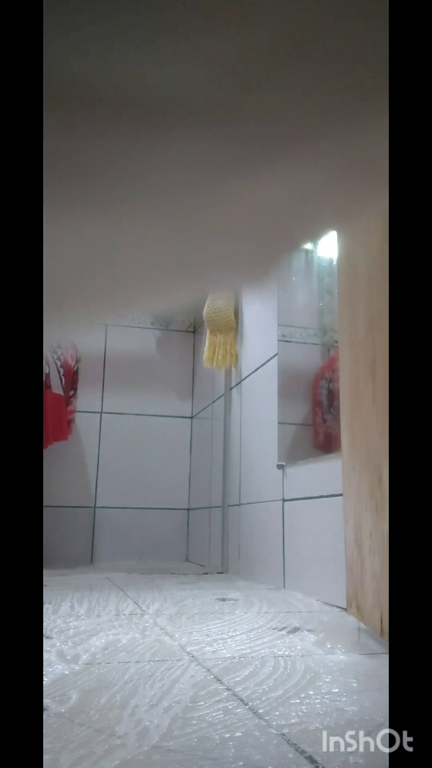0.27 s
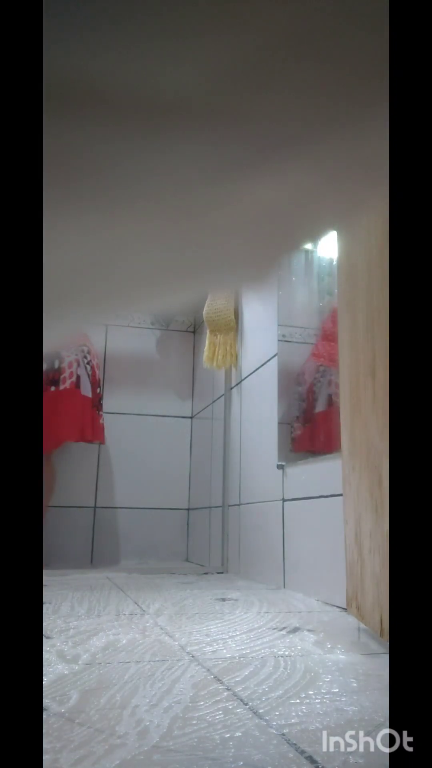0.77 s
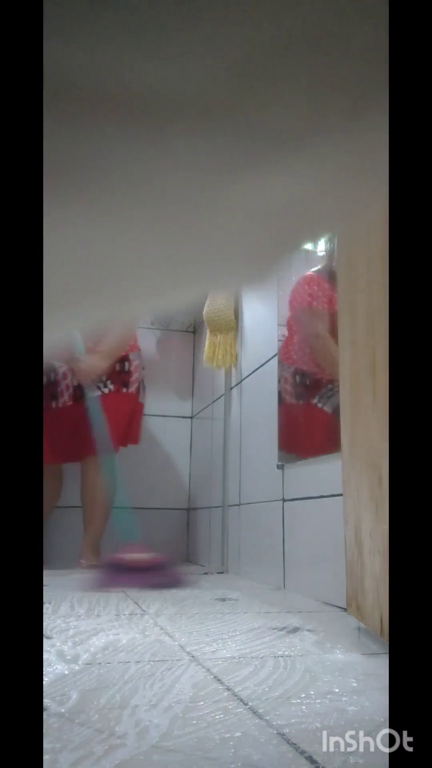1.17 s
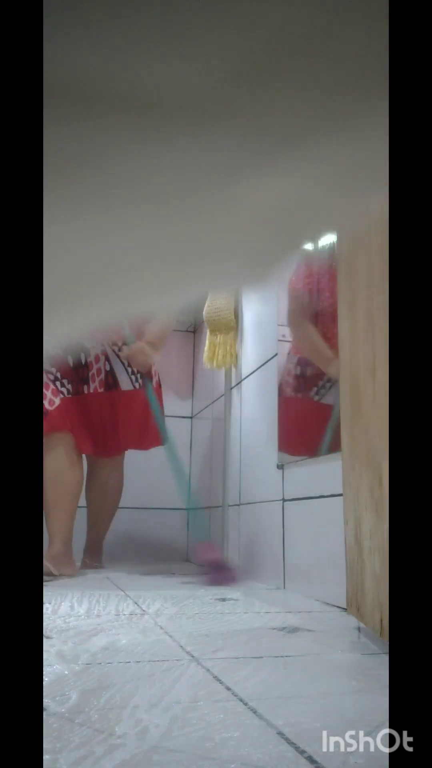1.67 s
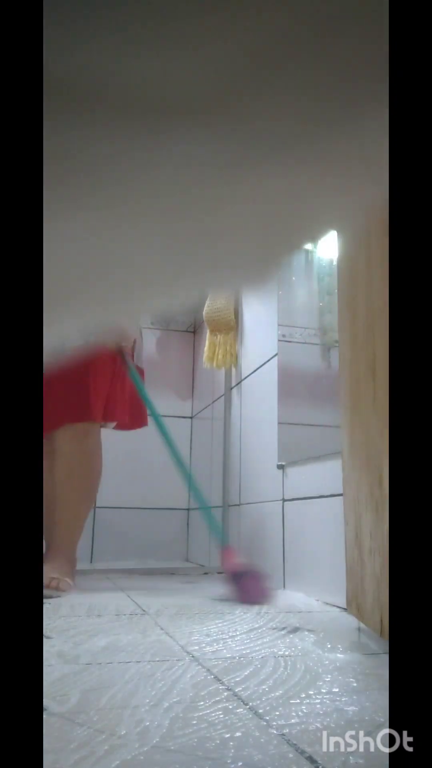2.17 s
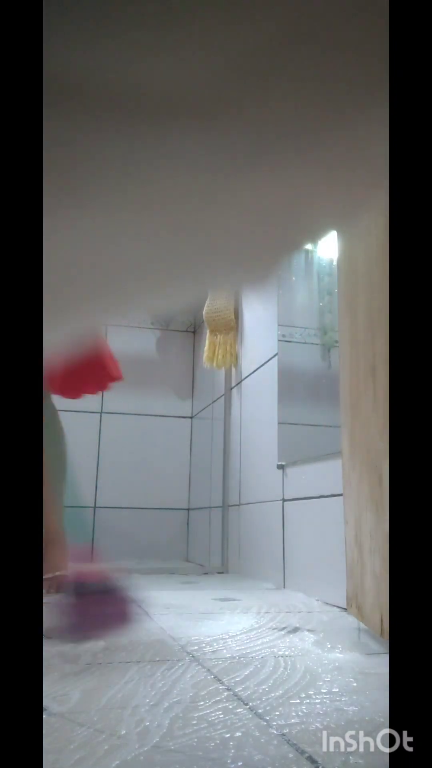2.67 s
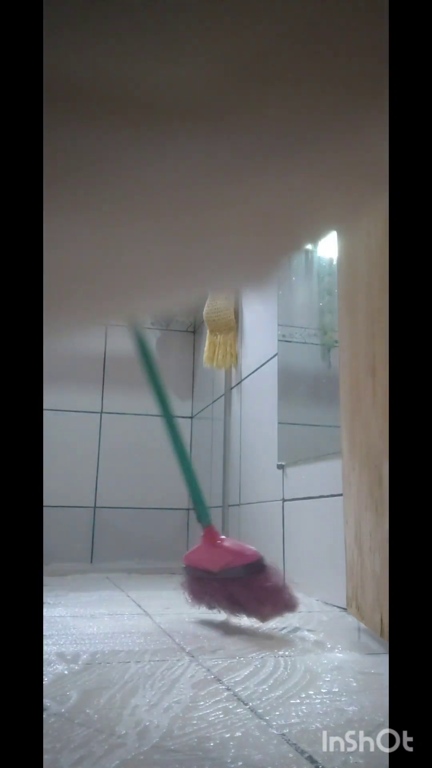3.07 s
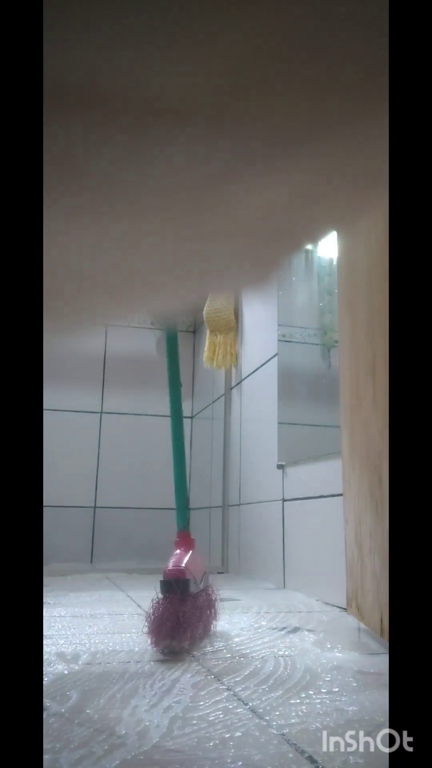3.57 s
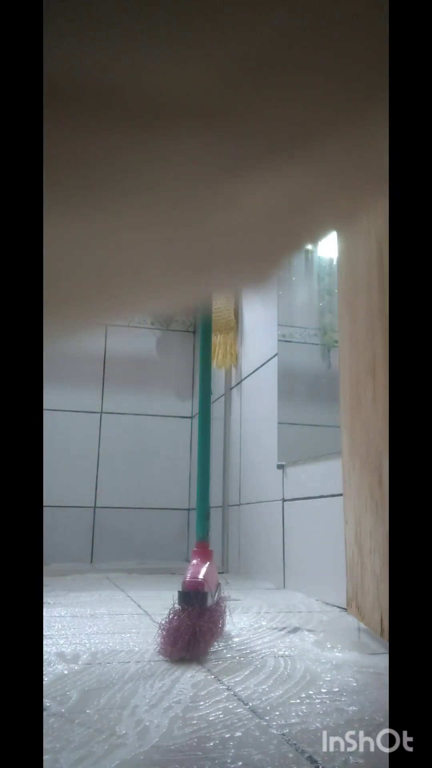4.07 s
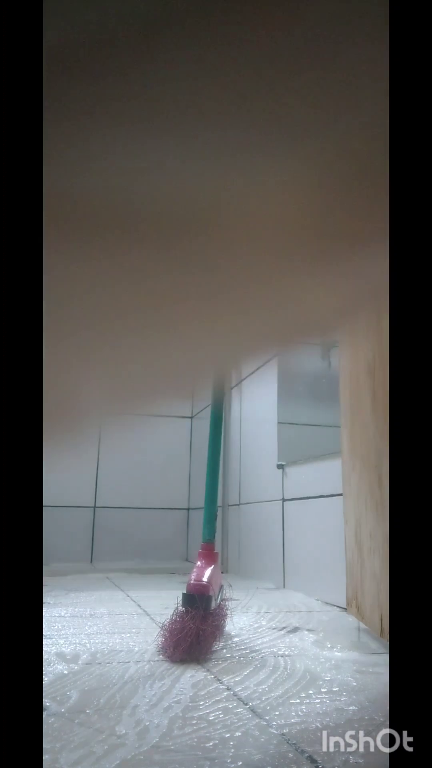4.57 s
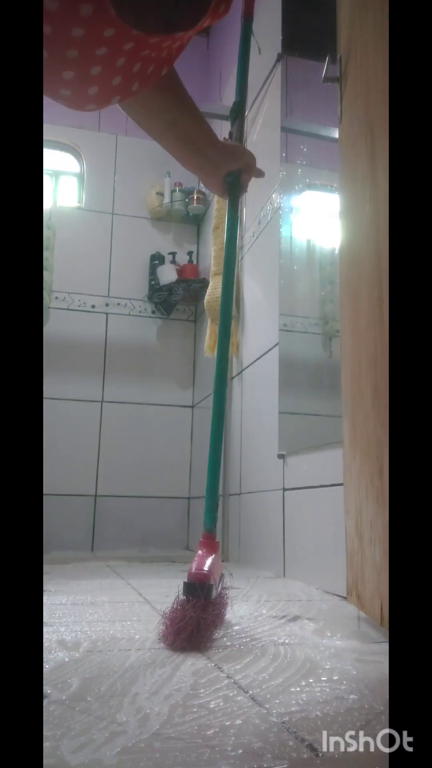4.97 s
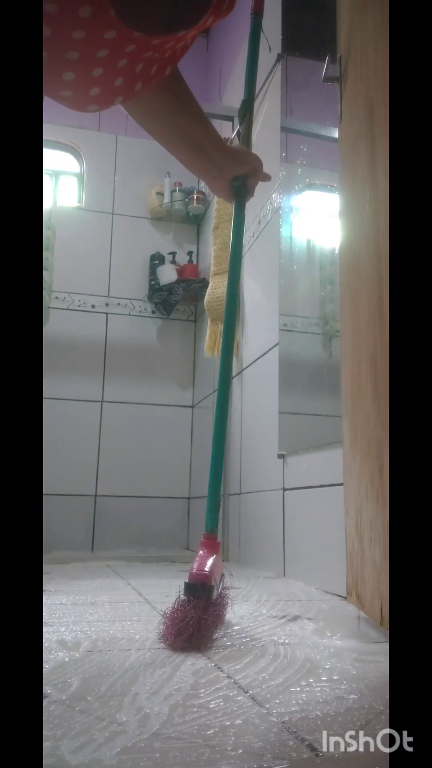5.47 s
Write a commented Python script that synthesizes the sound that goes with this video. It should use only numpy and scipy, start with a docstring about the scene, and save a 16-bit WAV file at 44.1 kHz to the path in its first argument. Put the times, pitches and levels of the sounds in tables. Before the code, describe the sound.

Muffled bristle scrubbing on soapy tile, faint ticks as the broom is set down, then cloth dragged roughly off the microphone with thumps and pops.

```python
"""A low house rumble, microphone hiss and hum last throughout, swelling and wavering.
First a stiff broom scrubs wet tiles in a small bathroom, heard by a phone under a cloth: noisy bristle
clicks ring at a moving pitch. Fainter scuffs follow, with ticks and squeaks as the broom is set down.
Then the cloth is pulled off: coloured clicks and noise make its rubs and pushes, puffs and rings
make its snaps and bumps, and trapped air pops at the left microphone."""
import sys
import numpy as np
from scipy import signal
from scipy.fft import rfft, irfft, next_fast_len
from scipy.io import wavfile
from scipy.ndimage import uniform_filter1d

SR = 44100
rng = np.random.default_rng(int(sys.argv[2]) if len(sys.argv) > 2 else 0)


def to_wav(sig):
    """Store sig (one row per channel, or 1-D mono) as 16-bit WAV at the path in sys.argv[1].

    Samples outside -1..1 are clipped; the rate is SR.
    """
    pcm = np.clip(np.atleast_2d(sig), -1, 1) * 32767
    pcm = np.round(pcm).astype(np.int16)
    wavfile.write(sys.argv[1], SR, pcm.T)  # frames by channels


N = 252693
SIZE = next_fast_len(N + 4096)  # padded length for the frequency filters
HZ = np.fft.rfftfreq(SIZE, 1 / SR)
STEP = 32  # samples between the points of a swell

# House floor noise, colour: pitch_hz, level_db (relative)
FLOOR_COLOUR = [(13, -60), (22, -17.5), (70, -6), (135, -3.5), (183, -13.5), (216, -9.5), (248, -5.5),
                (317, -11.5), (480, -9.5), (582, -17), (632, -10.5), (766, -21), (981, -21), (1440, -29.5),
                (15800, -47.5)]
FLOOR_DB = -63.5
# Likeness of the floor noise at both microphones: pitch_hz, likeness (-1 to 1)
FLOOR_LIKENESS = [(60, 0.99), (150, 0.96), (380, 1), (950, -0.12), (2380, -0.021), (5980, 0.22),
                  (15000, -0.61)]
# Side of the floor noise: pitch_hz, left_minus_right_db
FLOOR_SIDE = [(60, 0.5), (150, -1), (380, 3.5), (950, 6.5), (2380, -1), (5980, 0), (15000, 2)]
# Wavering hum: time_s, level_db (before the waver)
HUM_LEVEL = [(0, -64), (.47, -72), (.8, -69), (.89, -82), (1.96, -70), (4.25, -74), (5.5, -70), (5.73, -74)]
HUM_HZ = 217
# Low drone swells: top_s, rise_s, hold_s, fall_s, level_db (before the waver)
DRONE_SWELLS = [(1.43, 0.036, 0.14, 0.17, -60.5), (1.7, .08, 0.044, .12, -64.5), (1.94, .09, .02, .06, -55)]
DRONE_HZ = 80.7

# Broom strokes and last faint scuffs: top_s, rise_s, hold_s, fall_s, head_db, head_pitch_hz,
# rasp_over_head_db, fizz_over_head_db, rumble_over_head_db (levels before the room)
BROOM_STROKES = [(.07, 0.098, 0.043, 0.071, -37, 1130, -8, -23.5, -13.5),
                 (.232, 0.047, .005, 0.046, -43, 1140, -8, -21.5, -8.5),
                 (0.399, .1, 0.023, 0.11, -41, 1070, -6, -16.5, -12.5),
                 (.604, 0.078, 0.028, 0.047, -51, 1290, -6.5, -11, -12),
                 (.738, 0.04, 0.0043, 0.041, -46.5, 1180, -5.5, -13, -11),
                 (0.825, 0.15, 0.0076, 0.12, -54, 1230, -3.5, -11, -8),
                 (1.182, 0.074, .055, 0.069, -52, 1150, -4, -12.5, -11),
                 (1.415, 0.16, 0.0076, 0.098, -55.5, 1010, -5.5, -13.5, -16.5),
                 (1.689, 0.064, .03, .05, -59, 920, -2, -8.5, -9),
                 (1.748, 0.021, 0.028, 0.037, -49.5, 870, -6, -18.5, -12.5),
                 (1.904, .08, 0.035, 0.041, -47.5, 1180, -6, -18, -11),
                 (2.119, .1, 0.061, 0.036, -47, 1070, -6.5, -18.5, -12),
                 (2.328, 0.099, 0.066, .04, -47.5, 1070, -6, -20.5, -13.5),
                 (2.498, 0.095, 0.12, 0.032, -51.5, 1000, -4.5, -15.5, -11),
                 (2.705, 0.033, 0.012, 0.073, -62, 920, -1, -10, -12),
                 (2.762, 0.1, 0.0049, 0.059, -59, 970, -6, -14, -12),
                 (2.99, 0.26, 0.042, 0.054, -59, 940, -4, -11.5, -13),
                 (3.135, .02, 0.018, 0.11, -74, 1240, 3.5, -10, -6),
                 (3.263, 0.014, .005, 0.13, -64, 770, -7, -11.5, 2),
                 (3.486, 0.059, .005, .07, -70.5, 776, -3, -17, -1),
                 (3.548, 0.0082, 0.0091, 0.11, -65.5, 910, -5, -10, -6),
                 (3.628, .04, .005, 0.043, -66, 870, -14, -23, -9),
                 (3.718, 0.018, .005, 0.11, -72, 746, -9, -31, 6),
                 (3.815, 0.016, 0.0088, 0.25, -72.5, 780, -3.5, -15, -1),
                 (3.98, 0.11, .015, .03, -72, 845, -24, -12, -3),
                 (4.172, .01, 0.056, 0.057, -73, 840, -14, -18, 4)]
# Bristle colour through the cloth: pitch_hz, level_db (relative)
BRISTLE_COLOUR = [(32, -37), (55, 1), (163, -2), (274, 1.5), (449, -7), (556, -5.5), (625, -7.5),
                  (870, -5.5), (1810, -6.5), (2040, -2), (3340, -10.5), (4040, -12.5), (5890, -23.5),
                  (15500, -37.5)]
STROKE_DROP_DB, STROKE_ROUND = -15.5, 1.007  # level one rise or fall time away; 1 = pointed, 2 = rounded
# Share of that drop which each layer follows
HEAD_SWELL, RASP_SWELL, FIZZ_SWELL, RUMBLE_SWELL = 0.99, 0.9, 0.72, 0.75
# Change in dB per second of hold: the broom bears down, the suds thin out
HEAD_CLIMB_DB, RASP_CLIMB_DB, FIZZ_CLIMB_DB = 35, 24, -26
HEAD_SAG = 0.97  # pitch at the end of a stroke, as a share of that at its top
# Dull knocks of the broom head: time_s (starts 4 ms earlier), level_db, pitch_hz
HEAD_KNOCKS = [(0.036, -47.5, 275), (0.064, -43, 283), (0.23, -52, 229), (0.399, -48, 253),
               (0.737, -45, 274), (0.771, -52.5, 250), (0.837, -55, 288), (1.4, -62, 236),
               (1.759, -66, 227)]
# Bristle and handle ticks: start_s, level_db (before the room), pitch_hz, scuff_over_tick_db (before gain)
BROOM_TICKS = [(0.091, -30.5, 1990, -6), (1.084, -54, 940, -9.5), (1.852, -51, 992, -7),
               (2.995, -54.5, 940, -4), (3.134, -65, 2530, 8), (3.263, -60.5, 1000, -2),
               (3.547, -56, 1520, -0.5), (3.617, -53, 950, -10), (3.712, -71, 1370, -15),
               (3.809, -59.5, 1040, -7), (4.172, -65.5, 1100, -3), (5.382, -69.5, 1100, -1),
               (5.587, -66, 930, -13)]
# Squeaks of sliding wet bristles: top_s, rise_s, hold_s, fall_s, level_db (before the room), pitch_hz, width_hz
BRISTLE_SQUEAKS = [(3.133, 0.014, 0.027, .04, -65, 1800, 298), (3.132, .015, 0.036, .04, -72, 2570, 110),
                   (3.222, .015, .02, .02, -71.5, 1200, 120), (3.288, .03, 0.045, .04, -80.5, 2525, 110),
                   (3.48, .03, .01, .03, -76, 2980, 200), (3.81, .005, .015, 0.018, -78, 2620, 150)]
# Resonances of the air under the cloth: pitch_hz, width_hz, level_db
HOLLOW_RINGS = [(896, 23, -0.5), (1150, 77, -11), (2304, 270, 0), (2563, 190, -0.5), (3470, 460, -19),
                (3940, 670, -4.5), (5100, 260, -3)]
# Likeness of the broom at both microphones: pitch_hz, likeness (-1 to 1)
BROOM_LIKENESS = [(60, 1), (300, 0.91), (700, 1), (1500, 0.35), (4000, 0.18), (9000, .2)]
# Side of the broom: pitch_hz, left_minus_right_db
BROOM_SIDE = [(60, 0), (130, 0), (290, -0.5), (640, 9), (1410, 1.5), (3100, -4.5), (6820, -9), (15000, -12)]
# Delay as the broom moves: time_s, left_late_ms
BROOM_DELAY = [(0, 0.42), (1, 0.3), (1.15, 0.27), (2.4, 0.2), (2.6, 0.17), (5.73, 0.12)]

# Three pulls of the cloth: time_s, rub_db, hiss_over_rub_db, push_db (before side and catches)
CLOTH_PULLS = [
    [(4.24, -102, -2, -73), (4.252, -90, 11, -76), (4.274, -72.5, -7.5, -65), (4.354, -44, -9.5, -47.5),
     (4.41, -45, -9, -47), (4.426, -39.5, -18.5, -48), (4.43, -42.5, -6, -44), (4.458, -40, -16, -42),
     (4.478, -55.5, -10, -49.5), (4.496, -55, -12, -61.5), (4.556, -55, -7.5, -59), (4.572, -85, -3, -81),
     (4.585, -59, 1, -55)],
    [(4.586, -64, -24, -52), (4.598, -39, -8, -39.5), (4.642, -35, -5, -30.5), (4.65, -43, -0.5, -40),
     (4.662, -28.5, -7.5, -35), (4.686, -36.5, -3.5, -34.5), (4.774, -42, -12.5, -43.5),
     (4.816, -40, -15.5, -45), (4.854, -33, -6, -36), (4.87, -41.5, -1.5, -39.5), (4.88, -37.5, -5, -42),
     (4.914, -37.5, -6.5, -38.5), (4.93, -38, -5, -31)],
    [(4.931, -44, -2, -32), (4.937, -39, -5.5, -33.5), (4.959, -40, -14.5, -30.5),
     (4.993, -39.5, -15.5, -33.5), (4.999, -48, -10, -32.5), (5.011, -43, -17, -33.5),
     (5.033, -48, -12, -42), (5.053, -42, -19, -39), (5.073, -53.5, -7, -48.5), (5.093, -49, -9.5, -45),
     (5.191, -56.5, -8, -57.5), (5.215, -54.5, -8.5, -54.5), (5.255, -69.5, -4.5, -67),
     (5.46, -84.5, 0.5, -73)],
]
# Rub colour: pitch_hz, level_db (relative)
RUB_COLOUR = [(590, -7.5), (1000, -1), (1690, -3.5), (1980, -6), (2610, -3), (3290, -7.5), (4160, -29),
              (6000, -36.5), (7800, -42), (13200, -120)]
# Fibre hiss colour at the right: pitch_hz, level_db (relative)
RIGHT_HISS_COLOUR = [(2060, -35.5), (3500, -6), (4180, -6.5), (5940, -11.5), (7140, -10.5), (10200, -21.5),
                     (14200, -16.5), (15100, -21.5), (15800, -21.5)]
# Fibre hiss colour at the left, which stays half covered: pitch_hz, level_db (relative)
LEFT_HISS_COLOUR = [(2500, -20.5), (4000, 2.5), (5500, -4), (7200, -6.5), (8800, -15.5), (15000, -20)]
# Push colour: pitch_hz, level_db (relative)
PUSH_COLOUR = [(32, -34), (55, -4.5), (177, -2), (367, -3.5), (523, -5.5), (947, -1.5), (1050, 4.5),
               (1250, -4), (1900, -15.5), (2470, -36), (4180, -120)]
# Pocket between cloth and case changes size: time_s, pitch_hz
POCKET_PITCH = [(4.24, 2170), (4.58, 2170), (4.62, 1950), (4.9, 2100), (4.94, 1740), (5.0, 1760),
                (5.1, 2080), (5.46, 2100)]
# The hand moves from side to side: time_s, left_minus_right_db
PUSH_SIDE = [(4.24, 2), (4.4, -9), (4.5, 2), (4.66, -10.5), (4.88, -7.5), (4.94, 0), (5.03, 5),
             (5.08, -1.5), (5.15, 3), (5.46, 7)]
RUB_PAN_DB, DRAG_DB = 1.5, -8  # left minus right of the rub; drag on the case over the push
# The case is hauled along once: top_s, rise_s, hold_s, fall_s, level_db (before side)
CASE_HAUL = [(4.945, 0.014, 0.052, 0.026, -35.5)]
HAUL_RUB_DB = -10  # the haul rubs the fibres too
HISS_PAN_DB, HISS_PAN_PER_DB, HISS_FROM_DB = -12, -0.34, -60  # louder hiss leans further right
CRACKLE_DB, CRACKLES_PER_S = -14.5, 150  # small random snaps, over the hiss
# Fibres snap at a microphone: start_s, level_db (before side)
FIBRE_SNAPS = [(4.2677, -58), (4.3226, -44), (4.6014, -29.5), (4.6169, -24), (4.6608, -34), (4.6946, -27.5),
               (4.7184, -41), (4.755, -34), (4.8454, -33), (4.9234, -46), (5.049, -50), (5.0833, -58),
               (5.1023, -46), (5.1104, -49), (5.2234, -60)]
SNAP_T60 = .005  # seconds to fade by 60 dB
SNAP_PAN_DB, SNAP_PAN_PER_DB, SNAP_FROM_DB = -16.5, 0.15, -45  # snaps lean right, louder ones slightly less
# The hand bumps the phone: start_s, level_db (before side), pitch_hz, left_minus_right_db,
# crunch_over_bump_db (before gain)
PHONE_BUMPS = [(4.627, -42.5, 334, -11.5, -15), (4.637, -22.5, 150, -9.5, 4.5),
               (4.641, -24.5, 340, 17, -1.5), (4.846, -25.5, 573, -11, -1.5), (4.854, -23, 290, -23, 1),
               (4.935, -23.5, 342, 1, -22), (4.956, -19, 359, 3.5, -20), (4.966, -26, 355, -3, -19),
               (5.011, -30.5, 473, 1, -13), (5.047, -28.5, 185, -15, -3)]
# The cloth briefly seals the left microphone: start_s, pressure_db, length_s
AIR_POPS = [(4.64, -12, 0.0038), (4.943, -19.5, 0.0034)]
EDGE_HZ = 15850


def gain_of(db):
    """Decibels to amplitude."""
    return 10 ** (np.asarray(db) / 20)


def evened(x):
    """Scales the average power (rms) to 1."""
    return x / np.sqrt(np.mean(x ** 2) + 1e-20)


def read(points, hz):
    """Reads a table on a log-frequency axis."""
    f, value = np.transpose(points)
    return np.interp(np.log(hz + 1), np.log(f + 1), value)


def play(rows):
    """A mask that is open while a curve lasts, then the curve's columns at every sample."""
    s, *columns = np.transpose(rows)
    t = np.arange(N) / SR
    is_on = 1. * (t >= s[0]) * (t <= s[-1])
    return uniform_filter1d(is_on, size=400), *(np.interp(t, s, c) for c in columns)


def colour(x, points):
    """Gives a sound a fixed tone colour and rms 1."""
    spectrum = rfft(x, SIZE) * gain_of(read(points, HZ))
    return evened(irfft(spectrum, SIZE)[..., :N])


def grains(per_s, spread_db, channels=2):
    """Clicks at random times, of random sign and size, a few of them large."""
    size = gain_of(spread_db * np.minimum(rng.exponential(1, (channels, N)), 5))
    return size * rng.standard_normal((channels, N)) * (rng.random((channels, N)) < per_s / SR)


def drift(per_s, channels=2):
    """Slow random wandering of rms 1: noise with its fast changes filtered out."""
    noise = rfft(rng.standard_normal((channels, SIZE)))
    return evened(irfft(noise / (1 + (HZ / per_s) ** 2), SIZE)[:, :N])


def resonate(x, hz, width):
    """A resonance of gain 1: shifts the pitch hz down to zero, smooths, and shifts back."""
    turn = np.exp(2j * np.pi * np.cumsum(hz * np.ones(N)) / SR)
    r = np.exp(-np.pi * width / SR)
    smooth = signal.lfilter([1 - r], [1, -r], x / turn + 1e-18)
    return 2 * (turn * smooth).real


def late(x, lag_s):
    """Delays by a fixed or moving time."""
    return np.interp(np.arange(N) - lag_s * SR, np.arange(N), x)


def ports(pair, same, lean, lag_s):
    """Two microphones: the left hears the right's sound late, blended with a sound of its own."""
    right, shared, own = rfft([pair[0], late(pair[0], lag_s), pair[1]], SIZE)
    likeness = np.clip(read(same, HZ), -1, 1)
    tilt = gain_of(read(lean, HZ) / 2)
    left = likeness * shared + np.sqrt(1 - likeness ** 2) * own
    keep_power = np.sqrt(2 / (tilt ** 2 + tilt ** -2))
    return irfft(np.array([left * tilt, right / tilt]) * keep_power, SIZE)[:, :N]


def add(mix, s, sound):
    """Mixes a sound in at time s."""
    part = mix[:, round(s * SR):][:, :sound.shape[-1]]
    part += sound[..., :part.shape[1]]


def sides(db):
    """Left and right gain for a level difference, at steady total power."""
    return gain_of([db / 2, -db / 2]) / np.sqrt(np.cosh(db / 20 * np.log(10)))


def ring(hz, t60, rise_s):
    """One dying sine of peak 1, as from a struck object."""
    t = np.arange(round(t60 * SR)) / SR
    x = gain_of(-60 * t / t60) * (1 - np.exp(-t / rise_s)) * np.sin(2 * np.pi * hz * t)
    return x / abs(x).max()


def band(x, lo_hz, hi_hz):
    """One band of a sound."""
    return signal.sosfilt(signal.butter(3, [lo_hz, hi_hz], "band", fs=SR, output="sos"), x)


def burst(t60, lo_hz, hi_hz):
    """A short dying puff of noise in one band, different in each channel."""
    t = np.arange(round(.1 * SR)) / SR
    return band(rng.standard_normal((2, len(t))) * gain_of(-60 * t / t60), lo_hz, hi_hz)


def swell(s, rise_s, hold_s, fall_s):
    """Decibels below the top: a nearly straight rise, a hold from s on, a nearly straight fall."""
    t = np.arange(0, N, STEP) / SR - s
    away = np.where(t < 0, -t / rise_s, np.maximum(t - hold_s, 0) / fall_s)
    return STROKE_DROP_DB * away ** STROKE_ROUND


def summed(db):
    """Amplitude at every sample of swells that add in power."""
    total = np.sqrt((gain_of(db) ** 2).sum(axis=0))
    return np.interp(np.arange(N), np.arange(0, N, STEP), total)


def swells(rows):
    """Amplitude of rows of top_s, rise_s, hold_s, fall_s, level_db."""
    *times, db = np.transpose(rows)[:, :, None]
    return summed(db + swell(*times))


def tone(hz, gain, waver_db):
    """A fuzzy low tone: a sine whose level and pitch waver."""
    level, pitch = drift(24)
    turns = np.cumsum(hz * (1 + .012 * pitch)) / SR
    return gain * gain_of(waver_db * level) * np.sqrt(2) * np.sin(2 * np.pi * turns)


def house():
    """Low rumble of the house and microphone hiss from coloured noise, with a hum and a drone."""
    noise = colour(rng.standard_normal((2, N)), FLOOR_COLOUR)
    noise = noise * gain_of(FLOOR_DB + 1.1 * drift(15, channels=1))
    drone = tone(DRONE_HZ, swells(DRONE_SWELLS), 1.5)
    hum = tone(HUM_HZ, gain_of(play(HUM_LEVEL)[1]), 2.7)
    return ports(noise, FLOOR_LIKENESS, FLOOR_SIDE, .0001) + hum + drone


def strokes():
    """Thousands of bristle flicks ring the broom head; suds fizz above, the floor rumbles below."""
    columns = np.transpose(BROOM_STROKES)[:, :, None]
    s, rise, hold, fall, head_db, hz, rasp_db, fizz_db, rumble_db = columns
    shape, ends = swell(s, rise, hold, fall), s + hold + fall / 4
    pitch_times, pitches = np.hstack([s, ends]).ravel(), np.hstack([hz, HEAD_SAG * hz]).ravel()
    head_hz = np.interp(np.arange(N) / SR, pitch_times, pitches)
    held = np.clip(np.arange(0, N, STEP) / SR - s, 0, hold) - hold / 2  # seconds from mid-hold
    flicks = colour(grains(per_s=14000, spread_db=0.1), BRISTLE_COLOUR)
    body = flicks + gain_of(5) * resonate(flicks, head_hz, 380)
    layers = [  # level over the head in dB, then the band in Hz
        (HEAD_SWELL * shape + HEAD_CLIMB_DB * held, 600, 1700),
        (rasp_db + RASP_SWELL * shape + RASP_CLIMB_DB * held, 1700, 3100),
        (fizz_db + FIZZ_SWELL * shape + FIZZ_CLIMB_DB * held, 3100, 17000),
        (rumble_db + RUMBLE_SWELL * shape, 60, 600)]
    out = sum(summed(head_db + db) * evened(band(body, lo, hi)) for db, lo, hi in layers)
    return out * gain_of(1.75 * drift(23, channels=1))  # tufts catch on grout lines


def knocks(out):
    """The broom head knocks dully: low dying rings, without reverberation."""
    for s, db, hz in HEAD_KNOCKS:
        add(out, s - .004, gain_of(db) * ring(hz, 0.1, 0.0057))


def ticks(out):
    """Bristles and handle tick: a short ring and a click, then a scuff of dying noise."""
    for s, db, hz, scuff_db in BROOM_TICKS:
        add(out, s, gain_of(db) * (ring(hz, .015, .0001) - ring(700, .015, .0001)))
        click = gain_of(db) * 0.38 * burst(0.0022, 800, 8000)
        scuff = gain_of(db + scuff_db) * 2 * burst(0.094, 1000, 3250)
        add(out, s, click + scuff)


def squeaks():
    """Wet bristles slide: noise through two equal narrow resonances squeaks at their pitch."""
    out, noise = np.zeros((2, N)), rng.standard_normal((2, N))
    for *row, hz, width in BRISTLE_SQUEAKS:
        squeak = resonate(resonate(noise, hz, width), hz, width)
        out = out + swells([row]) * evened(squeak)
    return out


def hollow(x):
    """Air under the cloth rings along at its own pitches."""
    return x + sum(gain_of(db) * resonate(x, hz, width) for hz, width, db in HOLLOW_RINGS)


def tiles(x, t60, wet_db):
    """Short hard reverberation: dying noise as the echo tail, another for each channel."""
    t = np.arange(round(.4 * SR)) / SR
    tail = rng.standard_normal((2, len(t))) * gain_of(-60 * t / t60) * (t > .004)
    echoes = signal.fftconvolve(x, tail / np.linalg.norm(tail[0]), axes=1)[:, :N]
    return x + gain_of(wet_db) * echoes


def broom():
    """Strokes, ticks and squeaks share the hollow and the room; knocks join at the microphones."""
    out = strokes() + squeaks()
    ticks(out)
    out = gain_of(-0.5) * tiles(hollow(out), 0.27, -11.5)
    knocks(out)
    return ports(out, BROOM_LIKENESS, BROOM_SIDE, play(BROOM_DELAY)[1] / 1000)


def fibres(rub_db, hiss_db):
    """Many tiny slips of the fibres make the rub and, with noise and crackles, the hiss."""
    slips = grains(per_s=14000, spread_db=3.0)
    slips[0] = 0.66 * slips[0] + 0.33 * late(slips[1], 0.000537)  # the left hears the right's rubbing late
    catch = gain_of([[1.0], [1.8]] * drift(45))  # the cloth catches and lets go, most at the right
    rub = colour(slips, RUB_COLOUR)
    rub = catch * evened(rub + 1.6 * resonate(rub, play(POCKET_PITCH)[1], 350))
    left_hiss = colour(rng.standard_normal(N), LEFT_HISS_COLOUR)
    hiss = catch * np.array([left_hiss, colour(slips[1], RIGHT_HISS_COLOUR)])
    crackles = evened(band(grains(CRACKLES_PER_S, spread_db=2.5), 2500, 11000))
    hiss = hiss + gain_of(CRACKLE_DB) * crackles
    rub_gain = gain_of(rub_db) + gain_of(HAUL_RUB_DB) * swells(CASE_HAUL)
    hiss_pan = HISS_PAN_DB + HISS_PAN_PER_DB * (hiss_db - HISS_FROM_DB)
    return rub_gain * sides(RUB_PAN_DB)[:, None] * rub + gain_of(hiss_db) * sides(hiss_pan) * hiss


def pushes(push_db):
    """Uneven lumps of clicks make low pushes and, in a higher band, the drag on the case."""
    lumps = grains(per_s=2500, spread_db=0.85) * gain_of(0.6 * drift(51, channels=1))
    lumps = colour(lumps + 0.089 * lumps[::-1], PUSH_COLOUR)  # the case carries part of a push to both
    push, drag = evened(band(lumps, 40, 550)), evened(band(lumps, 550, 2200))
    drag_gain = gain_of(push_db + DRAG_DB) + swells(CASE_HAUL)
    return sides(play(PUSH_SIDE)[1]) * (gain_of(push_db) * push + drag_gain * drag)


def snaps(out):
    """Fibres snap at a microphone: very short puffs of bright noise."""
    for s, db in FIBRE_SNAPS:
        pan = SNAP_PAN_DB + SNAP_PAN_PER_DB * (db - SNAP_FROM_DB)
        snap = burst(SNAP_T60, 2500, 10300)
        snap = snap / abs(snap).max(axis=1, keepdims=True)
        add(out, s, gain_of(db) * sides(pan)[:, None] * snap)


def bumps(out):
    """The hand bumps the phone: a short low ring with a noisy crunch of the cloth."""
    for s, db, hz, pan, crunch_db in PHONE_BUMPS:
        side = sides(pan)[:, None]
        add(out, s, gain_of(db) * side * ring(hz, 0.0072 + 6 / hz, 0.00046))  # six swings and 7 ms
        add(out, s, gain_of(db + crunch_db) * side * 3 * burst(0.014, 240, 2800))


def cloth():
    """Fibres slip over each microphone: rub, hiss, drag and low pushes, with snaps and bumps."""
    on, rub_db, hiss_over_db, push_db = play(np.vstack(CLOTH_PULLS))
    out = on * (fibres(rub_db, rub_db + hiss_over_db) + pushes(push_db))
    snaps(out)
    bumps(out)
    return band(out, 64, 18000)


def pops():
    """Trapped air pops: a step of pressure, mostly left, then the microphone rings low as it recovers."""
    out, mostly_left = np.zeros((2, N)), np.array([[1], [.15]])
    for s, db, length in AIR_POPS:
        t = np.arange(round(length * SR)) / SR
        pressure = np.exp(-t / 0.0044) * signal.windows.tukey(len(t), .25)
        add(out, s, gain_of(db) * mostly_left * pressure)
        add(out, s + length, -gain_of(db - 9.5) * mostly_left * ring(68, 0.16, 0.00055))
    return band(out, 35, 18000)


def scene():
    """Broom, cloth and trapped air over the house."""
    return broom() + cloth() + pops() + house()


def record(dry):
    """Removes the treble above the band limit."""
    low_pass = signal.firwin(511, EDGE_HZ, window=("kaiser", 9), fs=SR)
    return signal.oaconvolve(dry, low_pass[None], "same")


dry = scene()
out = record(dry)
to_wav(out)
```